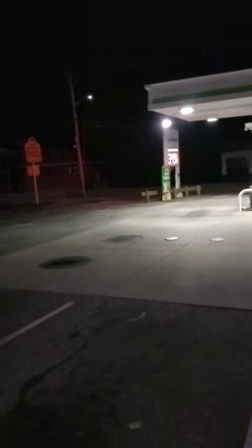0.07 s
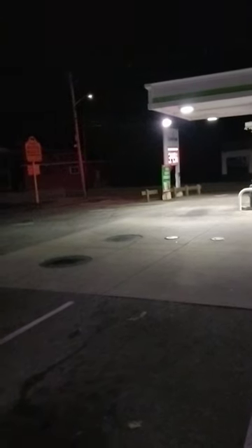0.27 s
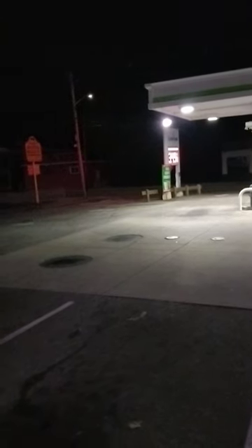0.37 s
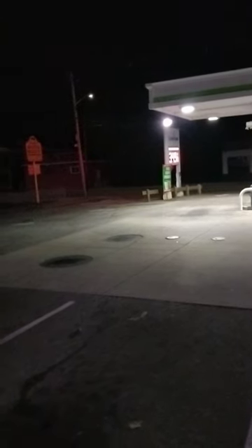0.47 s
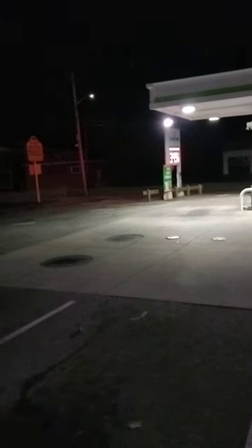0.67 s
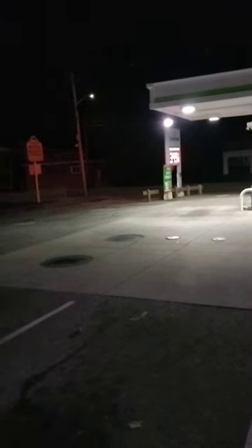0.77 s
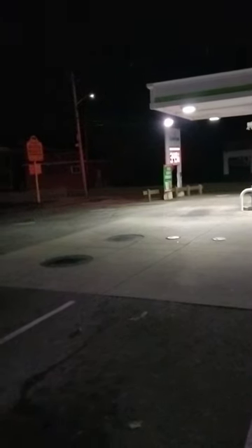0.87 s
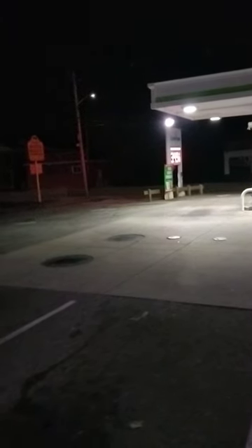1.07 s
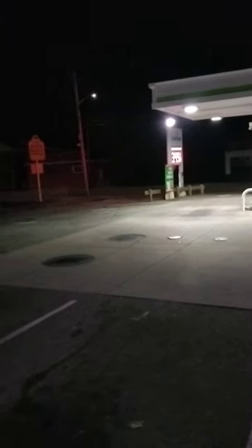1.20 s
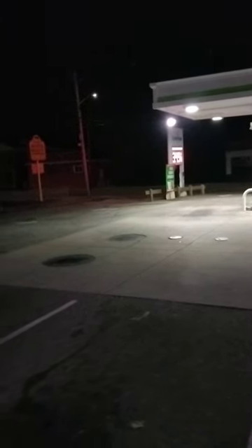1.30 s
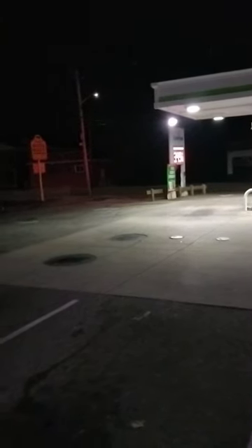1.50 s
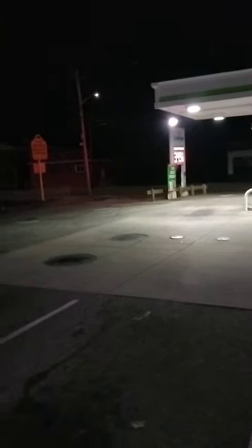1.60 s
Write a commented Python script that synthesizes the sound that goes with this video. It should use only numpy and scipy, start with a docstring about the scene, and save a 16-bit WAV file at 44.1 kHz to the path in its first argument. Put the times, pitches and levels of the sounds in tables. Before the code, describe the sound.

Small animals fight, spitting and squealing from about 0.2 seconds, with faint close ticks. The loudest screech rises and falls from 0.3 to 0.4 seconds. A faint low animal moan runs until 0.8, under more spits and squeals around 0.6 to 0.7. A snarl at 1.2 trails into a thin whine until about 1.6. The cries echo outdoors over steady machinery hum and distant town rumble.

```python
"""Night beside a filling station forecourt, heard through a stereo microphone with two ports.
Machinery hums over the rumble of a distant town. Small animals fighting in the dark spit and squeal,
with a few faint ticks close by, then let out one long rough screech. A low moan runs under more spits
and squeals, and a last snarl trails into a thin whine. Walls and the canopy throw the cries back."""
import sys
import numpy as np
from scipy import signal
from scipy.fft import rfft, irfft, next_fast_len
from scipy.io import wavfile

SR = 44100
rng = np.random.default_rng(int(sys.argv[2]) if len(sys.argv) > 2 else 0)


def to_wav(s):
    """Save 16-bit WAV."""
    ch = np.atleast_2d(s).T  # columns
    pcm = np.round(np.clip(ch, -1, 1) * 32767)  # PCM
    wavfile.write(sys.argv[1], SR, pcm.astype(np.int16))


N = 72765
TIME = np.arange(N) / SR

# Breath noise through the throat's resonances. Each row: frequency in Hz, relative level in dB.
BREATH_SPECTRUM = [(600, -35), (1300, -22.5), (1600, -17.5), (2050, 8.5), (2450, 1), (2750, -4.5),
                   (3300, 0), (3700, -7), (4100, -7.5), (4600, -13.5), (5200, -11), (6000, -17.5),
                   (7100, -17), (8600, -50), (9800, -29), (11000, -67), (15000, -47.5)]


def from_db(db):
    """Decibels to gain."""
    return 10 ** (np.asarray(db) / 20)


def unit_rms(x):
    """Scale to unit power."""
    return x / np.sqrt(np.mean(x ** 2) + 1e-20)


def in_time(rows):
    """Each column of a curve, sample by sample."""
    seconds, *columns = np.transpose(rows)
    return [np.interp(TIME, seconds, column) for column in columns]


def at_hz(rows, hz, column=1):
    """Read a spectrum on a log-frequency axis."""
    rows = np.array(rows)
    return np.interp(np.log(np.maximum(hz, 1)), np.log(rows[:, 0]), rows[:, column])


def shaped(x, response):
    """Filter by a response given as a function of frequency."""
    size = next_fast_len(2 * N)
    hz = np.arange(size // 2 + 1) * SR / size
    return irfft(rfft(x, size) * response(hz), size)[..., :N]


def noise(spectrum):
    """Unit noise of a given colour."""
    return unit_rms(shaped(rng.standard_normal(N), lambda hz: from_db(at_hz(spectrum, hz))))


def drift(rate_hz):
    """Smooth random wander of unit power, mostly slower than the given rate."""
    return unit_rms(shaped(rng.standard_normal(N), lambda hz: 1 / (1 + (hz / rate_hz) ** 2)))


def gate(start, length, attack_s=0.0021, release_s=0.0091):
    """Quick attack, hold, exponential release."""
    attack = np.clip((TIME - start) / attack_s, 0, 1)
    return attack * np.exp(-np.maximum(TIME - start - length, 0) / release_s)


def during(curve):
    """A gate open for the span of a curve."""
    return gate(curve[0][0], curve[-1][0] - curve[0][0])


def town_rumble(level_db=-44.5):
    """The distant town: steady noise, much alike at both ports in the bass and unrelated in the treble."""
    # Each row: frequency in Hz, relative level in dB.
    spectrum = [(20, -10), (40, -25), (62, 0), (100, -3.5), (140, 0.5), (190, -6), (300, -8.5), (400, -10),
                (520, -18), (740, -17), (1100, -21.5), (1600, -27.5), (2200, -23.5), (3600, -25),
                (5000, -47), (8000, -45), (11000, -52), (15500, -46.5)]
    # Each row: frequency in Hz, likeness of left and right from 0 to 1.
    likeness = [(30, 0.72), (110, 0.99), (350, 0.76), (700, 0.45), (1400, 0.49), (3000, 0)]
    mid = shaped(noise(spectrum), lambda hz: np.sqrt((1 + at_hz(likeness, hz)) / 2))
    side = shaped(noise(spectrum), lambda hz: np.sqrt((1 - at_hz(likeness, hz)) / 2))
    return from_db(level_db) * np.array([mid + side, mid - side])


def machinery_hum(waver_db=3.5, wander_rad=0.23):
    """Machinery holds a few low tones, each wavering in level and phase."""
    # Each row: frequency in Hz, level in dB.
    tones = [(118, -53.5), (232, -59.5), (292, -61), (644, -64.5), (859, -65.5)]
    hum = 0
    for hz, db in tones:
        level = from_db(db + waver_db * drift(4.9))
        hum = hum + level * np.sin(2 * np.pi * hz * TIME + wander_rad * drift(1))
    return np.sqrt(2) * hum


def resonant_breath(hz, width_hz):
    """Breath twice through one resonance."""
    b, a = signal.iirpeak(hz, hz / width_hz, fs=SR)
    return unit_rms(signal.lfilter(b, a, signal.lfilter(b, a, rng.standard_normal(N))))


def spits():
    """Voiceless bursts through the throat and mouth resonances, with some hiss."""
    # Each row: start and length in seconds, level in dB, mouth resonance in Hz,
    # then mouth and hiss in dB relative to the throat.
    bursts = [ (-.01, 0.019, -52, 2720, 10, 1), (0.1659, 0.0035, -27.5, 2820, -4.5, -20.5),
              (0.1977, 0.011, -27.5, 3240, -2, -11), (0.595, .014, -33, 2873, -0.5, -9.5),
              (0.607, 0.011, -39.5, 3177, -3, -3.5), (0.626, 0.0043, -32.5, 3310, 2.5, -30),
              (1.154, 0.012, -37, 3250, 3.5, -2.5)]
    mouth_rolloff = signal.butter(6, 3690, fs=SR, output="sos")
    out = 0
    for start, length, db, mouth_hz, mouth_db, hiss_db in bursts:
        throat = resonant_breath(1895, width_hz=175)
        mouth = from_db(mouth_db) * resonant_breath(mouth_hz, width_hz=1150)
        body = signal.sosfilt(mouth_rolloff, throat + mouth)
        hiss = from_db(hiss_db) * noise(BREATH_SPECTRUM)
        out = out + from_db(db) * gate(start, length) * (body + hiss)
    return out


def voice(hz, tone_db, rasp_db, octave_db, third_db, rough, treble_db=0):
    """A shrill jittering tone, its octave and two hoarse overtones, with breath pulsing on each cycle."""
    jitter, flutter_db = 0.06, 6  # at full roughness
    smear_rad, treble_hz = 0.36, 4800
    phase = 2 * np.pi * np.cumsum(hz * (1 + jitter * rough * drift(368))) / SR
    tone = np.sin(phase) + from_db(octave_db) * np.sin(2 * phase)
    for partial, db in [(3, third_db), (4, third_db - 13)]:  # hoarseness blurs these two
        tone = tone + from_db(db) * np.sin(partial * (phase + smear_rad * drift(460)))
    rasp = shaped(noise(BREATH_SPECTRUM), lambda f: from_db(treble_db * f**8 / (f**8 + treble_hz**8)))
    rasp = rasp * (1 + 0.085 * np.sin(phase))
    flutter = unit_rms(from_db(flutter_db * rough * drift(196)))
    return flutter * (from_db(tone_db) * np.sqrt(2) * tone + from_db(rasp_db) * rasp)


def squeals(onset_db=-3, build_s=0.0061):
    """Short cries on arched glides; each starts voiced and then grows hoarse."""
    # Each row: start and length in seconds; first pitch, last pitch and arch in Hz; tone and rasp in dB;
    # octave and third partial in dB relative to the tone; rasp treble gain in dB; roughness from 0 to 1.
    cries = [ (0.035, 0.082, 1930, 1935, 15.4, -54.5, -80, -11, -22, -13, 0.24),
             (0.132, 0.02, 1760, 1496, 10, -63, -74, 9, -17, -14, .3),
             (0.2313, 0.0168, 1940, 2357, 193, -24.5, -36, -18.5, -23, 1.5, .3),
             (0.264, .025, 2130, 2338, 217, -25.5, -36.5, -23, -24, 2, .35),
             (.495, .02, 1750, 1568, 13, -52, -43.5, 1, -19, 2, .8),
             (0.626, 0.025, 2100, 1981, 52, -28.5, -39.5, -19, -32, 1, .55),
             (0.661, 0.016, 2250, 2190, 37.5, -23, -31.5, -22.5, -31, -9, 0.2),
             (.688, 0.0079, 2140, 1862, 31, -25.5, -37.5, -12.5, -32, 1, 0.4),
             (0.696, 0.021, 1895, 1562, 11, -42, -38, -4.5, -17, 1.5, 0.61),
             (0.887, 0.0399, 1700, 1534, 25, -50, -59, -9, -28, -6, .7),
             (0.935, 0.04, 2250, 2150, 44, -50, -48.5, -28, -30, -21, 0.5),
             (0.985, 0.0073, 1800, 1739, 20, -52.5, -71, 5.5, -16, -5, .25),
             (1.122, 0.019, 2150, 2250, 79, -39.5, -56, -27, -30, -3, .8),
             (1.183, 0.032, 1854, 2010, 56.3, -32.5, -33, -9.5, -33, 1, .35),
             (1.211, 0.0195, 2100, 1933, 47, -29, -34, -7.5, -34, -0.5, .2),
             (1.505, 0.013, 2083, 1983, 12, -50, -64, -3, -30, -6, 0.14),
             (1.628, .04, 2080, 2044, 12, -53, -67, -26, -32, -6, .3)]
    out = 0
    for start, length, first_hz, last_hz, arch_hz, *timbre in cries:
        tone_db, rasp_db, octave_db, third_db, treble_db, rough = timbre
        progress = np.clip((TIME - start) / length, 0, 1)
        hz = first_hz + (last_hz - first_hz) * progress + arch_hz * np.sin(np.pi * progress)
        hoarse_db = onset_db * np.exp(-np.maximum(TIME - start, 0) / build_s)
        cry = voice(hz, tone_db, rasp_db + hoarse_db, octave_db, third_db + hoarse_db, rough, treble_db)
        out = out + gate(start, length) * cry
    return out


def ticks(decay_s=0.0032):
    """A few tiny dry clicks near the microphone."""
    # Each row: start in seconds, level in dB.
    clicks = [(.088, -58), (0.214, -45.5), (.238, -58), (0.249, -42)]
    # Each row: frequency in Hz, relative level in dB.
    colour = [(1000, -1), (5000, 2), (9000, -3), (12000, -4), (15000, 0)]
    level = sum(from_db(db) * (TIME >= s) * np.exp(-np.abs(TIME - s) / decay_s) for s, db in clicks)
    return level * np.array([noise(colour), noise(colour)])


def screech():
    """The longest unbroken cry of the fight's opening: it rises, falls and breaks up into rasp."""
    # Each row: time in seconds, pitch in Hz.
    pitch = [(.293, 2134), (.309, 2307), (.326, 2487), (.338, 2267), (.350, 2058), (.374, 1897),
             (.388, 1697), (.41, 1375)]
    # Each row: time in seconds, tone and rasp in dB, octave and third partial in dB relative to the tone,
    # roughness from 0 to 1.
    effort = [(.291, -48, -42, -24, -31, 0.03), (.297, -18.5, -36, -12.5, -26.5, 0),
              (.318, -14.5, -28, -39, -26, 0.45), (.339, -16, -29.5, -27, -36, 0.28),
              (.353, -11, -26.5, -16.5, -37, 0), (.370, -16.5, -30.5, -12, -30, 0.13),
              (.382, -31.5, -33.5, 7.5, -21, 0.2), (.398, -41, -36, 2.5, -21, 0.67),
              (.415, -59.5, -38, -8, -24.5, 0.94)]
    hz, = in_time(pitch)
    return during(effort) * voice(hz, *in_time(effort))


def moan(jitter=0.0855):
    """A faint, hoarse low tone under the fight."""
    # Each row: time in seconds, pitch in Hz, level in dB.
    contour = [(.33, 720, -80), (.40, 740, -52.5), (.48, 750, -68), (.55, 745, -45), (.61, 750, -59),
               (.68, 750, -45.5), (.78, 720, -57.5), (.83, 710, -51)]
    hz, db = in_time(contour)
    phase = 2 * np.pi * np.cumsum(hz * (1 + jitter * drift(161))) / SR
    return during(contour) * from_db(db) * np.sin(phase)


def whine():
    """A thin cry of nearly level pitch after the last snarl."""
    # Each row: time in seconds, pitch in Hz, level in dB.
    contour = [(1.25, 1953, -57), (1.28, 2003, -47.5), (1.35, 2056, -46), (1.40, 2090, -44),
               (1.46, 2074, -48.5), (1.51, 2076, -40.5), (1.54, 2031, -54), (1.56, 2005, -80)]
    hz, db = in_time(contour)
    return during(contour) * voice(hz, db, rasp_db=db - 17, octave_db=-16.5, third_db=-49, rough=0.34)


def arrival(x, delay_s=0, lag_ms=0):
    """One path to the two microphone ports; the left hears the direct sound first."""
    # Each row: frequency in Hz, lead of the left port in radians for sound from the fight.
    port_phase = [(700, 0.2), (1720, 1.1), (1980, 1.89), (2240, 3.55), (3360, 4.57), (4200, 4.33),
                  (5500, 6.45), (8000, 10.3), (16000, 25.3)]
    right = np.array([[0], [1]])
    delays = delay_s + right * lag_ms / 1000
    return shaped(x, lambda hz: np.exp(-1j * (2 * np.pi * hz * delays + right * at_hz(port_phase, hz))))


def diffuse_tail(x, build_s=0.0084):
    """Diffuse reflections that build up, then die sooner in the treble."""
    # Each row: frequency in Hz, band level in dB, seconds to fall by 60 dB.
    reverb = [(700, 7.5, 1.8), (2200, -10, 1.34), (3780, -6, 1.18), (5650, -1.5, 1.03), (7700, -4.5, 0.55),
              (14100, 5, 0.36)]
    edges_hz = np.geomspace(400, 16000, 12)
    build = 1 - np.exp(-TIME / build_s)
    response = 0
    for low, high in zip(edges_hz, edges_hz[1:]):
        hz = np.sqrt(low * high)
        bandpass = signal.butter(2, [low, high], "band", fs=SR, output="sos")
        band = signal.sosfilt(bandpass, rng.standard_normal((2, N)))
        fade = build * np.exp(-np.log(1000) * TIME / at_hz(reverb, hz, column=2))
        response = response + from_db(at_hz(reverb, hz)) * band * fade / np.sqrt(np.sum(fade ** 2))
    return signal.fftconvolve(x[None], response, axes=1)[:, :N]


def forecourt(x):
    """Direct sound, ground and wall echoes and a diffuse tail, coloured differently at each port."""
    # Each row: delay in seconds, level in dB, extra lag of the right port in milliseconds.
    echoes = [(.00195, -14.5, -0.057), (.0105, -7.5, -0.13), (0.044, -29.5, -.25), (0.077, -32.5, -0.16),
              (.12, -18.5, -0.24)]
    # Each row: frequency in Hz, left minus right in dB.
    port_shade = [(700, -3.5), (1700, -3), (2300, -5), (3300, 0.5), (4500, 4.5), (7500, 10), (12000, -11)]
    ahead = 0.23  # share of the tail's power that comes from the direction of the fight
    heard = arrival(x + np.sqrt(ahead) * diffuse_tail(x)[0])
    heard = heard + np.sqrt(1 - ahead) * diffuse_tail(x)
    for delay_s, db, lag_ms in echoes:
        heard = heard + from_db(db) * arrival(x, delay_s, lag_ms)
    return shaped(heard, lambda hz: from_db(at_hz(port_shade, hz) * np.array([[.5], [-.5]])))


def scene():
    """The fight across the forecourt, over the night background."""
    cries = screech() + squeals() + spits() + whine()
    return forecourt(cries) + moan() + ticks() + town_rumble() + machinery_hum()


def record(dry):
    """The top is cut steeply."""
    cutoff_hz = 15900
    return signal.sosfilt(signal.ellip(12, .1, 80, cutoff_hz, fs=SR, output="sos"), dry)


dry = scene()
out = record(dry)
to_wav(out)
```